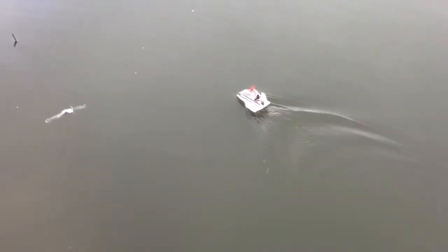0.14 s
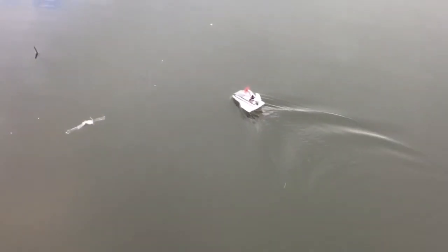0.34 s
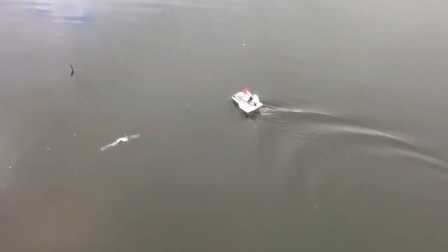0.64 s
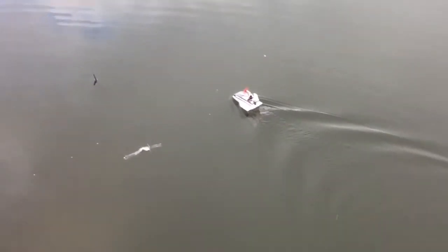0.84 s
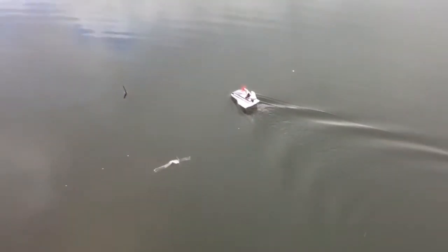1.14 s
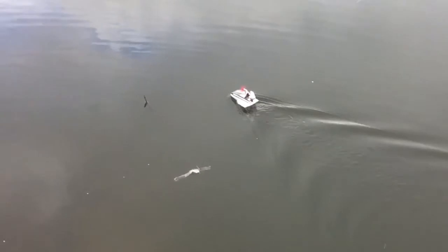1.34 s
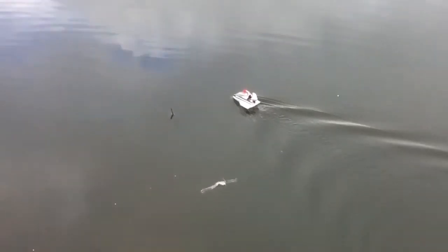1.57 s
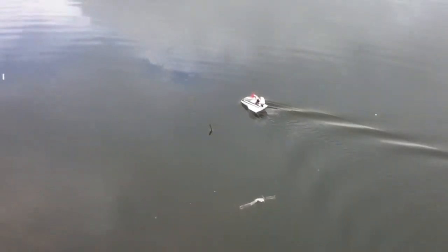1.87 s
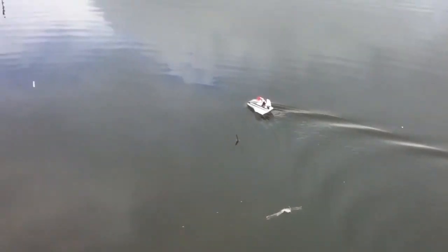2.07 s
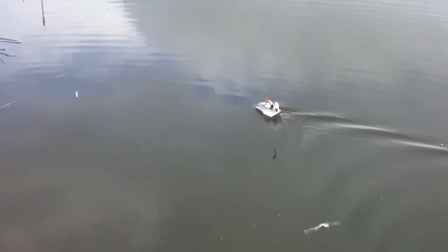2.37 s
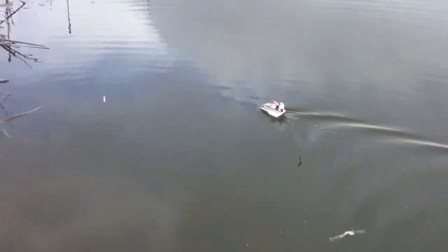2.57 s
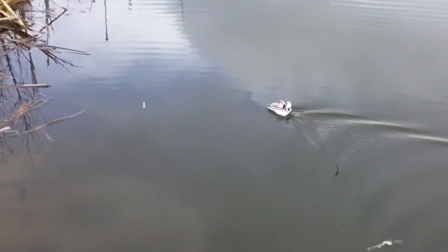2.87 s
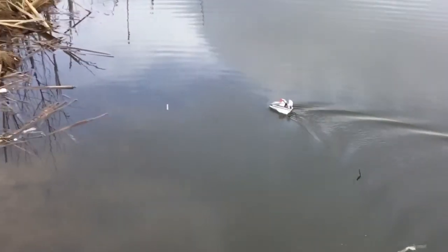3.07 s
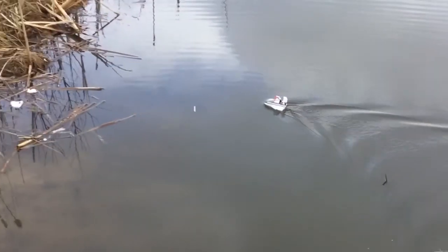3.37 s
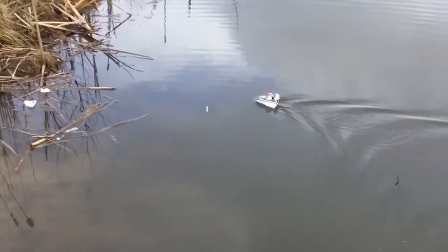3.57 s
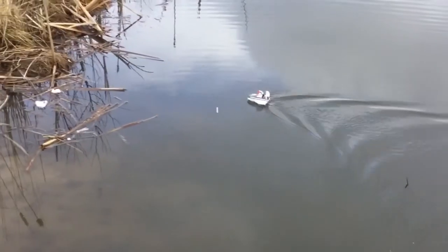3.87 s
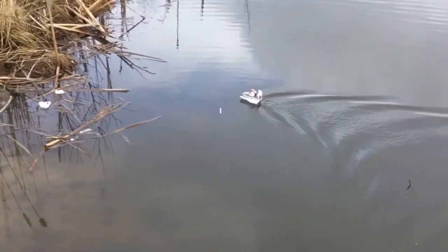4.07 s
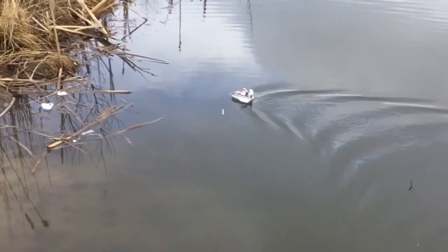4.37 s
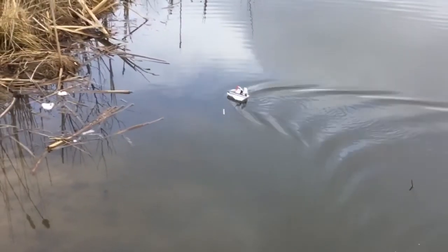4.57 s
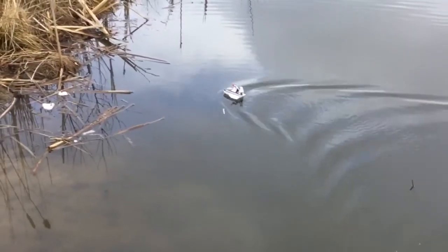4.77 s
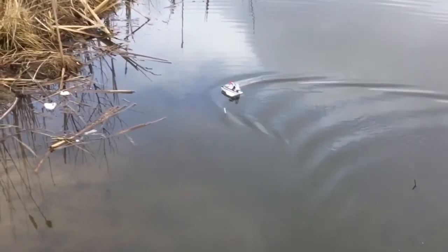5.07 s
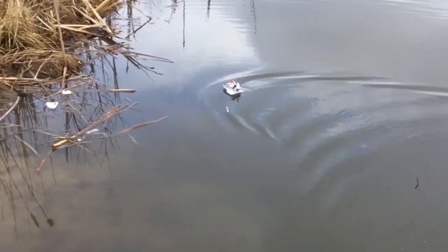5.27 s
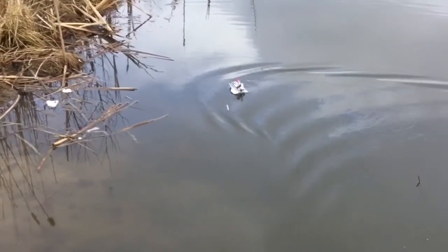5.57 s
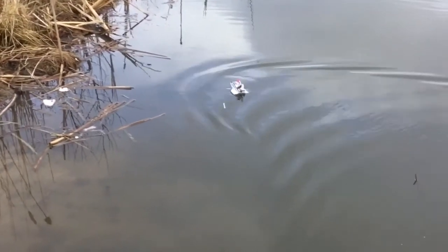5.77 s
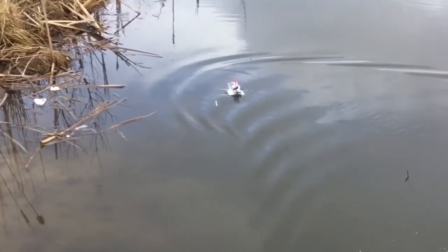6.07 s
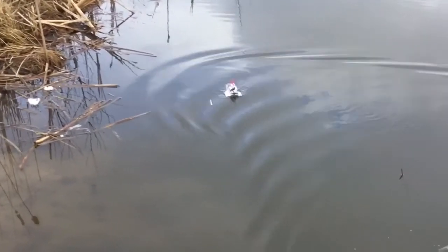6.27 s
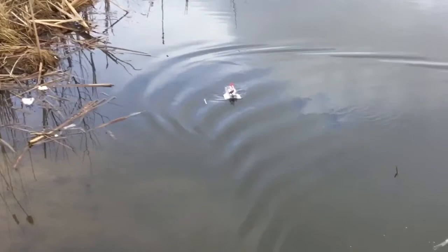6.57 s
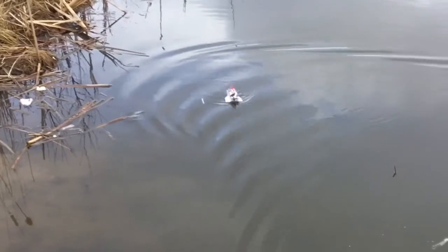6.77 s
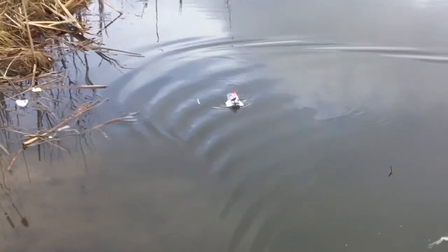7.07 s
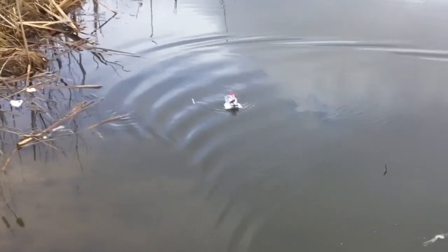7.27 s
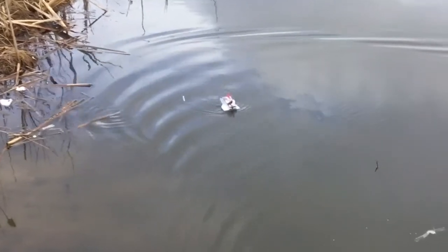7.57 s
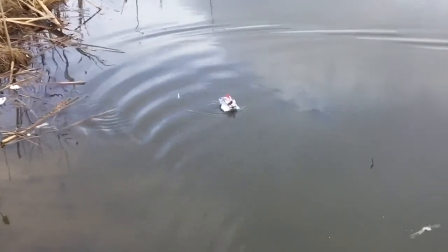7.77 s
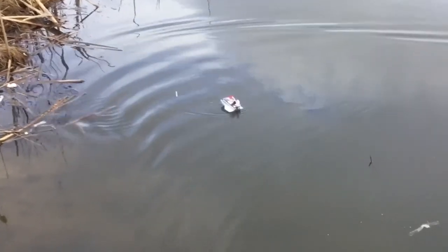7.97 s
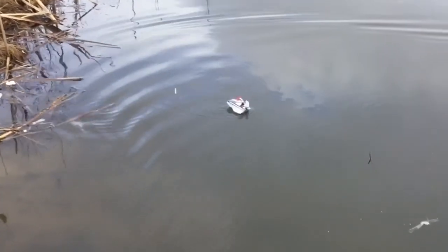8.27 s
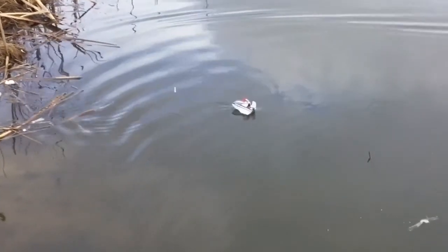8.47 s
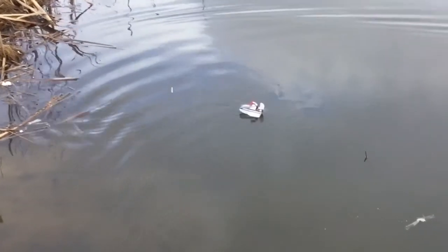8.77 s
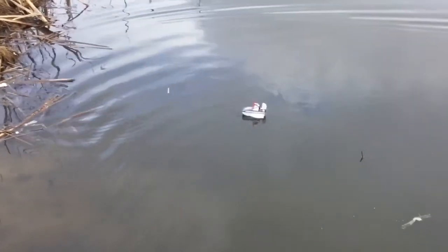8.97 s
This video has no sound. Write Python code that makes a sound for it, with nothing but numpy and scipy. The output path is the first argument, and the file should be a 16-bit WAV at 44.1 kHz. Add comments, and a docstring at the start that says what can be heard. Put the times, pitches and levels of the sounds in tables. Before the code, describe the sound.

The high, raspy whine of a little model boat motor stops, restarts after a few sharp clicks and stops again, over faint traffic.

```python
"""A toy boat's brushed electric motor whines across a pond, over far traffic and a mains hum.
At 3.5 s the handset's lever clicks close by, the power is cut and the motor coasts down; faint
far whistles, a bright metallic tick and more clicks follow. At 5.1 s it restarts at part throttle,
and the speed controller, which chops the current on and off, sings along. From 5.8 s a hand bumps
the single microphone now and then. At 8.7 s the power is cut again."""
import sys
import numpy as np
from scipy import signal
from scipy.fft import rfft, irfft, next_fast_len
from scipy.io import wavfile
from scipy.ndimage import uniform_filter1d

SR = 44100
rng = np.random.default_rng(int(sys.argv[2]) if len(sys.argv) > 2 else 0)


def store_wav(level_fs):
    """Save 16-bit WAV to argv[1]."""
    pcm = np.round(np.clip(np.atleast_2d(level_fs), -1, 1) * 32767)
    wavfile.write(sys.argv[1], SR, pcm.T.astype(np.int16))


N = 403074

# The two motor runs, full then part throttle: on_s, off_s, coast_s, tone_fade_db_per_s
RUNS = [(-1, 3.515, .42, 200), (5.117, 8.72, .52, 30)]
SPIN_UP_S, JOLT_S = .056, .022  # how fast the rotor speeds up and the starting jolt dies


def amp(db):
    """Turn decibels into a gain."""
    return 10 ** (np.asarray(db) / 20)


def unit(x):
    """Scale x to an average strength (rms) of 1."""
    return x / np.sqrt(np.mean(x ** 2) + 1e-20)


def curve(points):
    """Join (time, value) points with straight lines."""
    return np.interp(np.arange(N) / SR, *np.transpose(points))


def since(start_s):
    """Seconds after start_s, 0 before."""
    return np.maximum(np.arange(N) / SR - start_s, 0)


def gate(on, off, fade_s):
    """1 between on and off, with short fades."""
    t = np.arange(N) / SR
    return np.clip(np.minimum(t - on, off + fade_s - t) / fade_s, 0, 1)


def wobble(rate, count=N):
    """A wandering curve through `rate` random points a second."""
    points = rng.standard_normal(int(count * rate / SR) + 2)
    return np.interp(np.arange(count) * rate / SR, np.arange(len(points)), points)


def bell(hz, centre_hz, octaves, steepness=2):
    """1 at the centre pitch, falling away on both sides."""
    return np.exp(-.5 * (np.log2(hz / centre_hz) / octaves) ** steepness)


def filtered(x, response):
    """Give each frequency in x the gain response(hz)."""
    size = next_fast_len(len(x) + 8192)
    return irfft(rfft(x, size) * response(np.fft.rfftfreq(size, 1 / SR)), size)[:len(x)]


def noise(spectrum, patchy_db):
    """Noise of strength 1, shaped by (hz, dB) points, with louder and softer patches."""
    pitches, levels = np.transpose(spectrum)
    grid = signal.stft(rng.standard_normal(N), nperseg=512)[2]
    patches = uniform_filter1d(rng.standard_normal(grid.shape), size=6, axis=0)
    patches = uniform_filter1d(patches, size=12, axis=1)
    x = signal.istft(grid * amp(patchy_db * unit(patches)), nperseg=512)[1][:N]
    colour = lambda hz: amp(np.interp(np.log(hz + 1), np.log(pitches + 1), levels, -120, -120))
    return unit(filtered(x, colour))


def tone(phase, db, flutter_db):
    """A pure tone whose level flutters around db."""
    gain = np.sqrt(2) * amp(db + flutter_db * wobble(25, len(phase)))
    return gain * np.sin(phase + rng.uniform(0, 2 * np.pi))


def traffic():
    """Far traffic rumbles in slow swells."""
    # The rumble's colour: pitch_hz, relative_db
    rumble = [(15, -84.5), (25, -45.5), (90, -11.5), (108, -9), (174, 0), (366, -12.5), (438, -20.5),
              (515, -21), (580, -16), (1170, -19), (1290, -22), (1370, -21), (2010, -26.5), (3000, -86),
              (3900, -110), (6600, -120)]
    return amp(-47 + .85 * wobble(3.03)) * noise(rumble, patchy_db=1.5)


def mains_hum():
    """A slightly unsteady hum near 120 Hz."""
    return tone(2 * np.pi * np.cumsum(120 + 1.3 * wobble(6)) / SR, db=-54.5, flutter_db=1)


def whistles():
    """Short, soft whistles far off, level or falling in pitch."""
    # Each whistle: start_s, length_s, from_hz, to_hz, level_db
    glides = [(3.908, .07, 1700, 1700, -60), (4.19, 0.17, 1330, 1220, -56.5), (4.2, 0.098, 2600, 2550, -77)]
    x = np.zeros(N + SR)
    for start_s, length_s, from_hz, to_hz, db in glides:
        progress = np.linspace(0, 1, round(length_s * SR))
        phase = 2 * np.pi * np.cumsum(from_hz * (to_hz / from_hz) ** progress) / SR
        swell = np.sqrt(2) * amp(db) * np.sin(np.pi * progress) ** 1.2
        x[round(start_s * SR):][:len(swell)] += swell * np.sin(phase)
    return x[:N] * amp(4.3 * wobble(110))


def hand_bumps():
    """Dull bumps travel through the microphone's body, sagging in pitch."""
    # Each bump: start_s, level_db, base_pitch_hz, length_s
    bumps = [(5.837, -31, 199.6, 0.021), (6.745, -32, 200.5, 0.02), (7.2434, -20.5, 253, 0.01),
             (8.75, -33, 200.2, .014)]
    x = np.zeros(N + SR)
    for start_s, db, hz, length_s in bumps:
        progress = np.linspace(0, 1, round(length_s * SR))
        swing = np.sin(2 * np.pi * np.cumsum(hz * (1.2 - .84 * progress)) / SR)
        swell = 2.14 * amp(db) * progress ** .68 * (1 - progress) ** .99
        x[round(start_s * SR):][:len(swell)] += swell * swing
    return x[:N]


def close_clicks():
    """Close clicks, mostly from a plastic lever, and one bright metallic tick near 3.95 s;
    each rings briefly and has a short gritty tail."""
    # Each click: start_s, level_db, centre_hz, width_octaves, ring_s (time to fall 60 dB)
    clicks = [(3.4967, -25, 5060, 0.59, .03), (3.685, -59, 5230, .08, .15), (3.799, -50, 4900, 0.29, 0.065),
              (3.9506, -31, 11000, 1.45, 0.027), (3.9625, -39, 11000, 1.9, 0.051),
              (4.483, -44, 4000, 0.21, 0.052), (4.5557, -20.5, 4240, 0.64, 0.02),
              (4.5639, -18.5, 3200, 0.72, 0.026), (4.572, -42, 5010, 0.82, 0.016),
              (4.5763, -32, 4500, 0.64, 0.032), (4.586, -51, 4500, 0.62, 0.024),
              (4.635, -59.5, 7000, .7, .02), (4.671, -55, 3670, 0.21, .06), (4.85, -59, 4300, 0.2, 0.15),
              (5.013, -27.5, 4800, 0.49, 0.013)]
    # The notes a click can ring: pitch_hz, relative_db
    notes = [(650, 1), (1270, 17), (1650, 11.5), (2800, -4.5), (3600, 0), (4450, -2.5), (4800, 1),
             (5300, -2.5), (6100, -12), (7000, -1.5), (8200, -15.5), (9300, -26), (12300, -14),
             (14000, -3.5)]
    x, t = np.zeros(N + SR), np.arange(SR // 5) / SR
    for start_s, db, centre_hz, octaves, ring_s in clicks:
        near = lambda hz: bell(hz + 1, centre_hz, octaves)
        detunes = 1 + rng.normal(0, .02, len(notes))
        ring = sum(near(hz) * amp(level + rng.normal(0, 3.4)) * np.sin(2 * np.pi * hz * detune * t)
                   for (hz, level), detune in zip(notes, detunes))
        grit = unit(filtered(rng.standard_normal(len(t)), near))
        blow = .13 * ring * amp(-60 * t / ring_s) + .23 * grit * amp(-120 * t / ring_s)
        blow /= np.max(np.abs(blow))
        tail = amp(-34.5 - 60 * t / .19) * grit
        attack = 1 - np.exp(-t / (2.1 * ring_s ** 3))  # slow rubs start softly, snaps at once
        x[round(start_s * SR):][:len(t)] += amp(db) * attack * (blow + tail)
    return x[:N]


def boat_motion(run):
    """The rotor's share of its running speed, and the way the boat points."""
    # The boat's turning, per run: time_s, heading_degrees
    turns = [
        [(0, 0), (.7, 22), (1.5, 50), (2.2, 78), (2.8, 118), (3.5, 150)],
        [(5.12, -25), (5.8, 35), (6.4, 90), (7, 145), (7.6, 200), (8.2, 255), (8.72, 300)],
    ]
    on, off, coast_s, _ = RUNS[run]
    spin_up = 1 - np.exp(-since(on) / SPIN_UP_S)
    water_drag = (1 + since(off) / coast_s) ** -2.4
    return spin_up * water_drag, curve(turns[run])


def facing_db(heading, mean_db, swing_db, loudest_degrees):
    """Sound leaves the hull more strongly one way, so its level changes as the boat turns."""
    return mean_db + swing_db * np.cos(np.radians(heading - loudest_degrees))


def churn_levels(run, heading):
    """Levels of drone, rasp and hiss: a jolt at power on; a kick, drop and fade at power off."""
    # Drone, rasp and hiss around the hull, per run: mean_db, swing_db, loudest_degrees
    directions = [
        [(-49.5, 1.4, 290), (-55, 2.1, 286), (-56.5, 4.6, 29)],
        [(-47.5, 0.35, 160), (-52, 0.68, 290), (-49.3, 2.2, 120)],
    ]
    # How each meets the switching: jolt_db, standstill_loss_db, kick_db, drop_db, fade_after_1_s_db
    switching = [(7, 9, 6.5, 11, 12), (5, 5, 3.5, 6, 90), (12, 22, 2, 41, 25)]
    kick_s, drop_s = .03, .045
    on, off = RUNS[run][:2]
    after_kick = since(off + kick_s)
    for direction, (jolt, loss, kick, drop, fade) in zip(directions[run], switching):
        start_db = jolt * np.exp(-since(on) / JOLT_S) - loss * np.exp(-since(on) / SPIN_UP_S)
        kick_db = kick * np.clip(since(off) / kick_s, 0, 1)
        fall_db = (kick + drop) * (1 - np.exp(-after_kick / drop_s)) + fade * after_kick ** 2
        yield facing_db(heading, *direction) + start_db + kick_db - fall_db


def churn(run, speed_share, phase, drone_db, rasp_db, hiss_db):
    """The motor's noise: the hull drones, the shaft rasps and the sparking brushes hiss."""
    # The three noise colours: pitch_hz, full_throttle_relative_db, part_throttle_relative_db
    hull_colour = [(296, -43.5, -36), (495, -11, -2), (740, 2.5, -1), (1140, -3, -2.5), (1480, 3, 1),
                   (1890, 2.5, 4.5), (2210, -8.5, -3.5), (2420, -3, 1), (2660, -34.5, -36)]
    shaft_colour = [(2190, -27.5, -34), (2487, 3.5, 8), (2496, -0.5, -2.5), (3005, -7, -8.5),
                    (3180, 5, 1.5), (3500, -5, 0.5), (3700, 2.5, 0.5), (4220, 3.5, 2), (4500, -43.5, -36.5)]
    brush_colour = [(4000, -30.5, -34), (4400, -1, -4.5), (4860, -6.5, -7.5), (5540, -6, -4),
                    (6500, -1, -1.5), (8240, -4.5, -3), (8400, -8.5, -7), (11000, -5, -8),
                    (12000, -12.5, -8.5), (13400, -7, -7), (15900, -14.5, -13)]
    drone, rasp, hiss = (noise(np.array(colour)[:, [0, 1 + run]], patchy_db=1.08)
                         for colour in (hull_colour, shaft_colour, brush_colour))
    sparks = 1 + .25 * np.sin(phase) + .092 * np.sin(phase / 4)  # once a contact, uneven round the turn
    rattle_db = 3.5 * (1 - speed_share) * wobble(40)  # the freewheeling shaft rattles
    return amp(drone_db) * drone + amp(rasp_db + rattle_db) * rasp + amp(hiss_db) * unit(sparks * hiss)


def coasting(rate_hz, phase, off):
    """As the shaft slows, high overtones slide down through the pitches where the hull rings."""
    # The shaft's overtones: multiple of the contact rate, first_band_db, second_band_db
    overtones = [(14.7, -60, -100), (19, -66, -100), (25, -59.5, -79), (32, -68, -100), (42, -63, -92),
                 (49.5, -80, -93), (64, -84, -110)]
    # Bands where the hull rings: centre_hz, width_octaves
    bands = [(3700, .16), (6900, .135)]
    x, free = np.zeros(N), slice(round(off * SR), round(off * SR) + SR)
    for multiple, *levels in overtones:
        gain = sum(amp(db) * bell(multiple * rate_hz[free], hz, octaves, steepness=4)
                   for db, (hz, octaves) in zip(levels, bands))
        x[free] += np.sqrt(2) * gain * np.sin(multiple * phase[free])
    chatter_db = 4 * wobble(110)  # the brushes chatter
    return x * amp(chatter_db - 14.5 * since(off))


def speed_controller(motor_phase):
    """At part throttle the current is chopped at a fixed rate; that tone mixes with the motor's."""
    # The chopping tone and its octave around the hull: mean_db, swing_db, loudest_degrees
    directions = [(-61.5, 8.1, 285), (-55.5, 2.4, 237)]
    # The starting current in those two: level_db, fade_db_per_s, snap_db
    surges = [(-41.5, 65, 3), (-50, 44, 10)]
    # Higher chopping tones: multiple, above_octave_db
    overtones = [(4, -19), (6, -35), (7, -38), (8, -35)]
    # Mixed tones: chop_multiple, motor_multiple, above_octave_db
    mixes = [(1, 1, -11), (1, 2, -10.5), (1, 3, -10), (2, 1, -11.5), (2, 2, -14), (1, 7, -21)]
    chop_hz = 986
    on, off = RUNS[1][:2]
    heading, age = boat_motion(1)[1], since(on)
    surge_dbs = [start - fade * age + snap * np.exp(-age / JOLT_S) for start, fade, snap in surges]
    base_db, octave_db = (20 * np.log10(amp(facing_db(heading, *direction)) + amp(surge_db))
                          for direction, surge_db in zip(directions, surge_dbs))
    phase = 2 * np.pi * chop_hz * np.arange(N) / SR
    x = tone(phase, base_db, flutter_db=1) + tone(2 * phase, octave_db, flutter_db=3)
    spun_up = np.clip(age / .21, 0, 1)
    # the starting current has hard edges until the rotor turns
    edge_db = 18 * np.clip((.17 - age) / .11, 0, 1) * spun_up ** .2
    x += sum(tone(multiple * phase, octave_db + db + edge_db, flutter_db=4) for multiple, db in overtones)
    x += spun_up * sum(tone(chop * phase + spin * motor_phase, octave_db + db, flutter_db=3)
                       for chop, spin, db in mixes)
    return gate(on, off, fade_s=.0028) * x


def whine(run, rate_hz, phase, heading, hiss_db):
    """Clean tones at multiples of the contact rate, while the rotor is driven and just after."""
    # The strong tones: multiple
    strong = [1, 2, 3, 4, 5, 6, 7, 8, 9, 10, 13, 14]
    # Each strong tone around the hull, per run: mean_db, swing_db, loudest_degrees
    directions = [
        [(-46, 0.6, 287), (-63, 10, 31), (-46.8, 8, 25), (-48.5, 1.5, 20), (-52, 1, 5), (-67, 5.5, 15),
         (-46, 7.5, 242), (-46.5, 6, 311), (-49.4, 8.5, 15), (-66.5, 6.5, 64), (-63.5, 2, 150),
         (-62.5, 4.5, 40)],
        [(-52.5, 0.4, 140), (-57.5, -0.3, 113), (-52.5, 1.2, 220), (-54, 3.5, 290), (-56, 0, 240),
         (-64, 1.5, 120), (-60.5, 1.5, 187), (-53.5, 3.5, 145), (-59.5, 5, 296), (-60.5, 2.5, 57),
         (-70, 3.7, 98), (-79, 2.2, 194)],
    ]
    # The weak tones: multiple, full_throttle_above_hiss_db, part_throttle_above_hiss_db
    faint = [(1.5, -11.5, -13.5), (2.5, -13.5, -17), (3.5, -4, -17), (6.5, -16.5, -35), (8.5, -19, -32),
             (11, -12.5, -26), (12, -15, -22), (15, -11, -18), (16, -15.5, -22.5), (17, -18, -26),
             (18, -18, -30)]
    on, off, _, fade_db_per_s = RUNS[run]
    x, live = np.zeros(N), slice(max(round(on * SR), 0), round((off + .5) * SR))
    rate_hz, phase, heading, hiss_db = rate_hz[live], phase[live], heading[live], hiss_db[live]
    lag_db = 4 * np.exp(-since(on)[live] / .1)  # higher tones take longer to build
    for multiple, direction in zip(strong, directions[run]):
        rocking_db = .7 * wobble(3, len(phase))  # the hull rocks
        boom_db = 12 * bell(multiple * rate_hz + 1, centre_hz=720, octaves=.16)  # the hollow hull rings
        fade_db = (fade_db_per_s + 65 * (multiple - 1)) * since(off)[live]
        db = facing_db(heading, *direction) + rocking_db + boom_db - multiple * lag_db - fade_db
        x[live] += tone(multiple * phase, db, flutter_db=.44 + .09 * multiple)
    x[live] += sum(tone(multiple * phase, hiss_db + levels[run], flutter_db=3)
                   for multiple, *levels in faint)
    return x


def motor():
    """Brushes rub over the rotor's spinning contacts; the rate at which these pass sets the pitch."""
    # Running speed, wavering with the propeller's load, per run: time_s, contact_rate_hz
    speeds = [
        [(0, 457.3), (.45, 458.5), (.72, 458.2), (.99, 456.6), (1.26, 456.8), (1.5, 458.3), (1.9, 457),
         (2.2, 457), (2.32, 456.1), (2.45, 457.1), (2.7, 456.3), (3.5, 456.2)],
        [(5.4, 444), (5.7, 444.8), (6.25, 447.8), (6.4, 446.6), (6.5, 447.3), (7, 446.3), (7.35, 445.4),
         (7.75, 446), (8.05, 447.4), (8.3, 445.6), (8.72, 443.5)],
    ]
    x = np.zeros(N)
    for run, (on, off, *_) in enumerate(RUNS):
        speed_share, heading = boat_motion(run)
        rate_hz = speed_share * curve(speeds[run]) * (1 + .0005 * wobble(30))
        phase = 2 * np.pi * np.cumsum(rate_hz) / SR
        drone_db, rasp_db, hiss_db = churn_levels(run, heading)
        rush = churn(run, speed_share, phase, drone_db, rasp_db, hiss_db)
        tones = whine(run, rate_hz, phase, heading, hiss_db)
        x += gate(on, off + 1.1, fade_s=.0055) * (tones + rush) + coasting(rate_hz, phase, off)
    return x + speed_controller(phase)  # the second run's phase


def scene():
    """One microphone feeds both channels."""
    return np.tile(motor() + whistles() + close_clicks() + hand_bumps() + mains_hum() + traffic(), (2, 1))


def record(dry):
    """The small microphone loses the deep bass; the highest treble is cut off."""
    bass_hz, top_hz = 65, 15843
    response = lambda hz: np.clip((top_hz - hz) / 90, 0, 1) * hz ** 4 / (hz ** 4 + bass_hz ** 4)
    return np.tile(filtered(dry[0], response), (2, 1))


dry = scene()
out = record(dry)
store_wav(out)
```